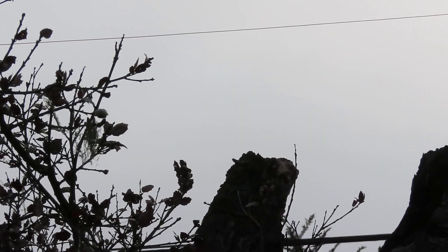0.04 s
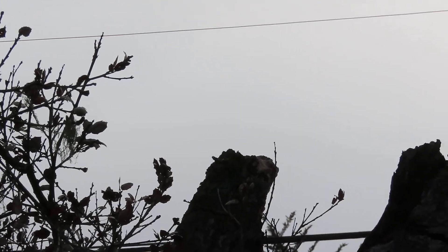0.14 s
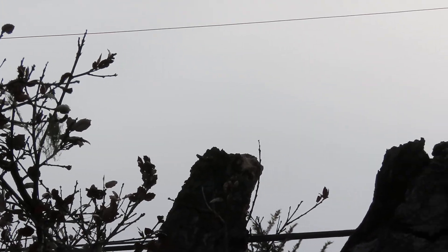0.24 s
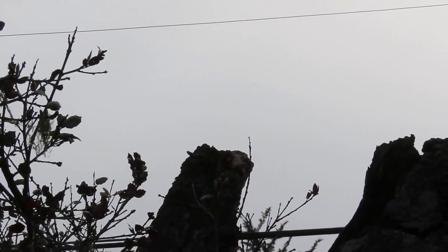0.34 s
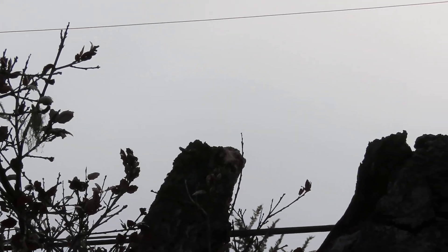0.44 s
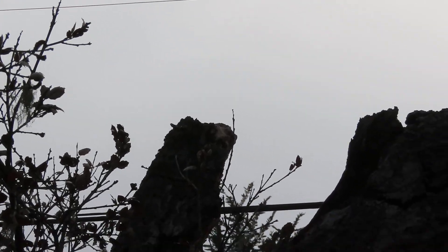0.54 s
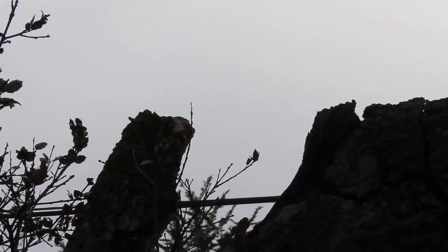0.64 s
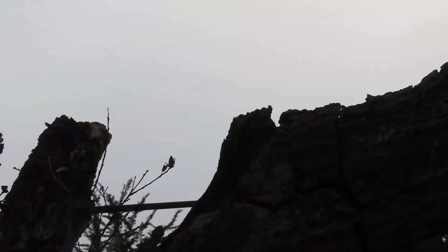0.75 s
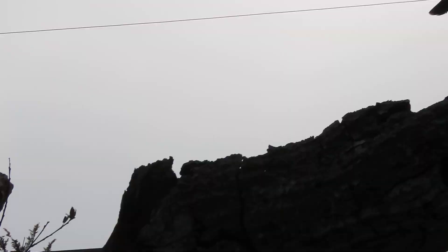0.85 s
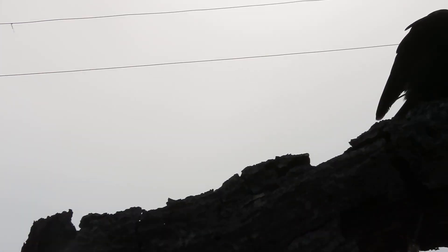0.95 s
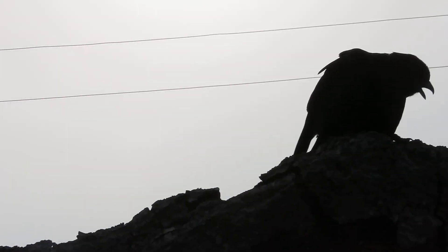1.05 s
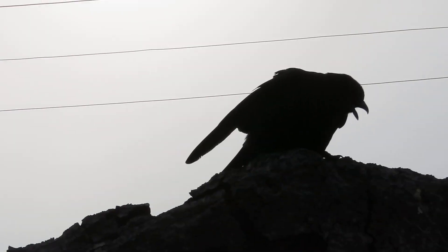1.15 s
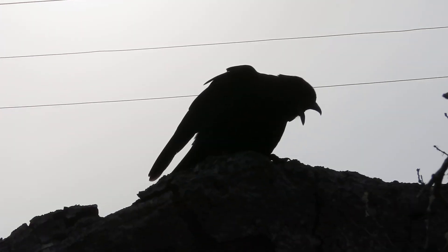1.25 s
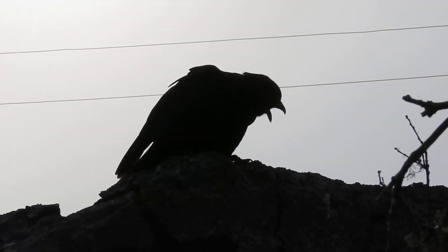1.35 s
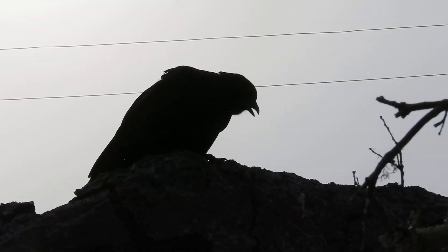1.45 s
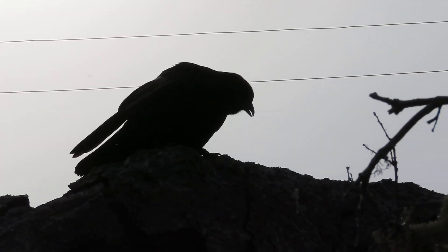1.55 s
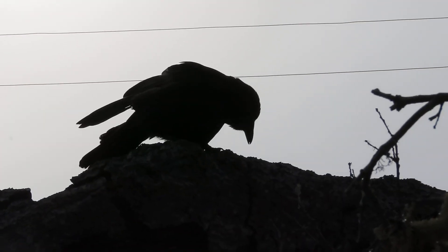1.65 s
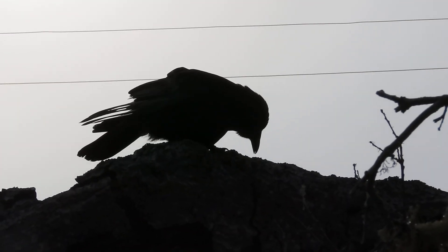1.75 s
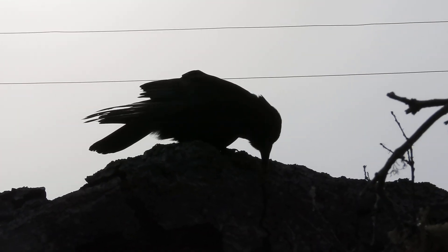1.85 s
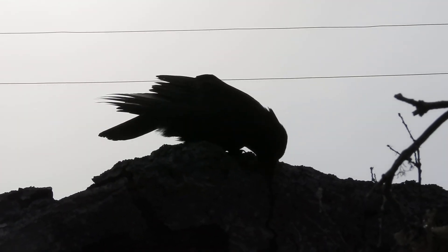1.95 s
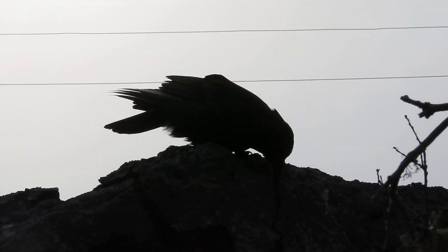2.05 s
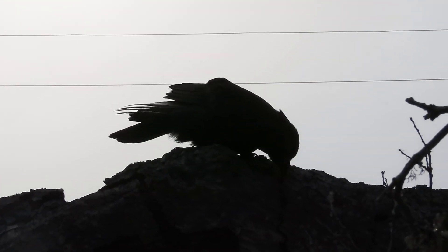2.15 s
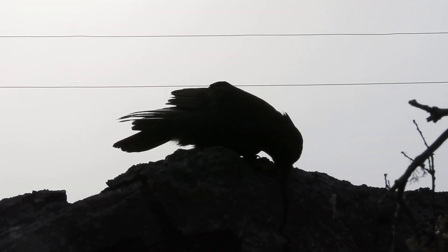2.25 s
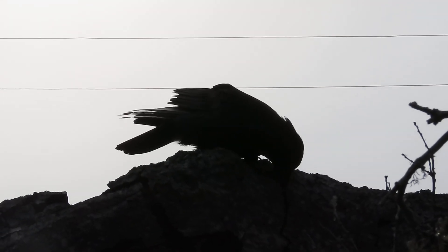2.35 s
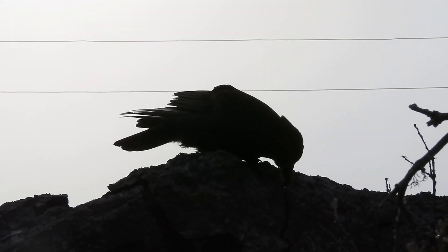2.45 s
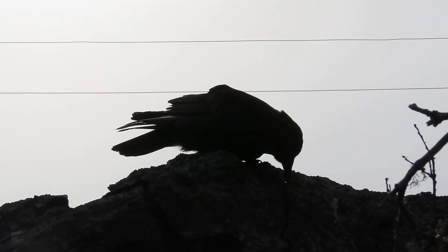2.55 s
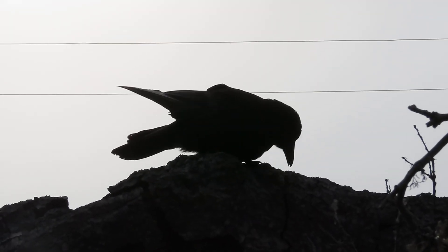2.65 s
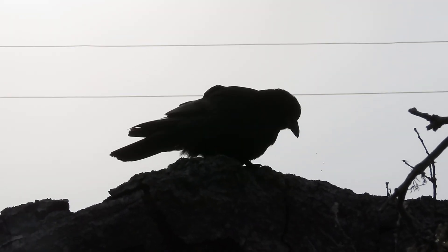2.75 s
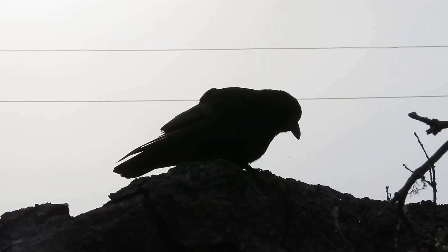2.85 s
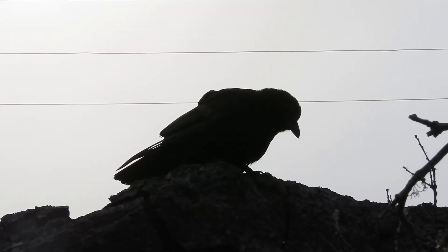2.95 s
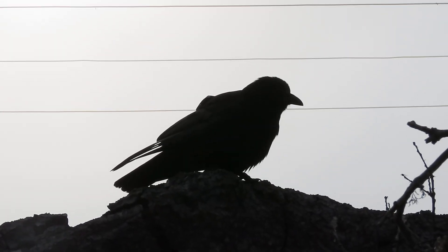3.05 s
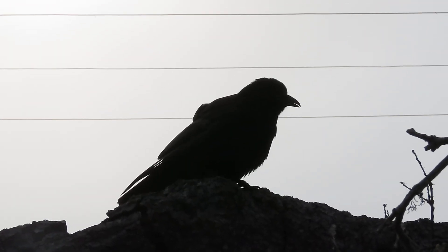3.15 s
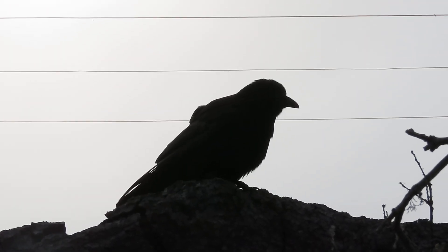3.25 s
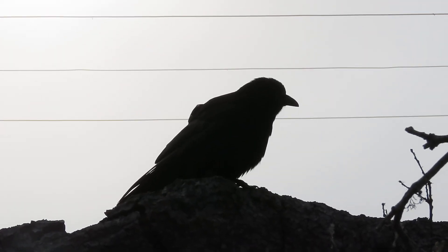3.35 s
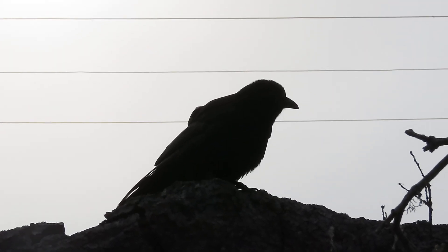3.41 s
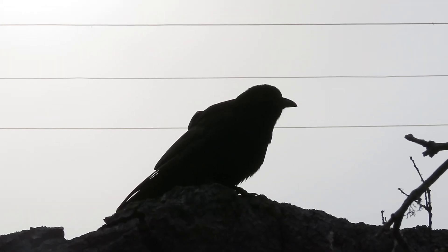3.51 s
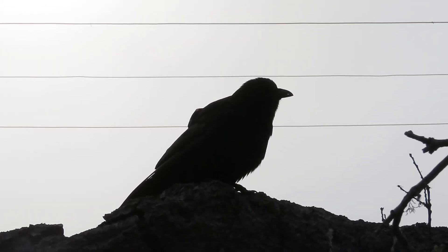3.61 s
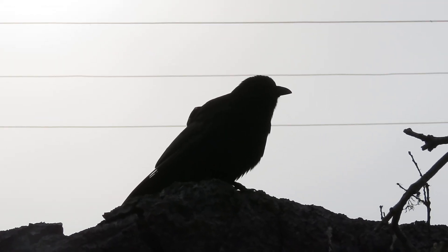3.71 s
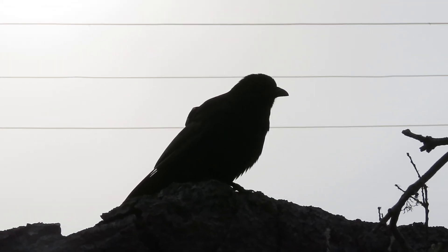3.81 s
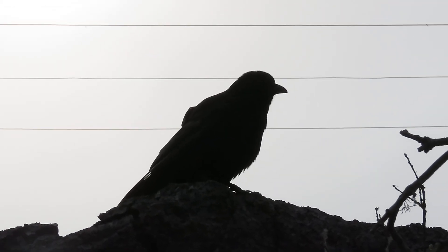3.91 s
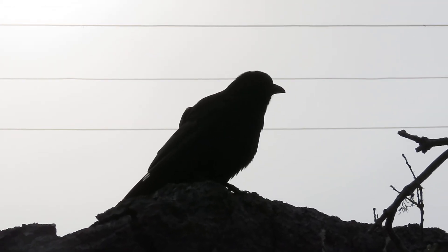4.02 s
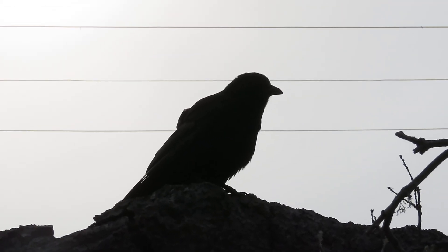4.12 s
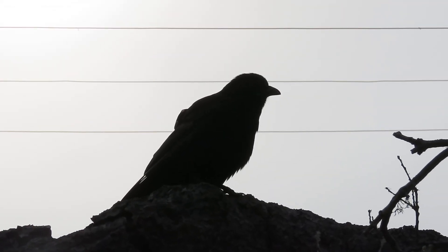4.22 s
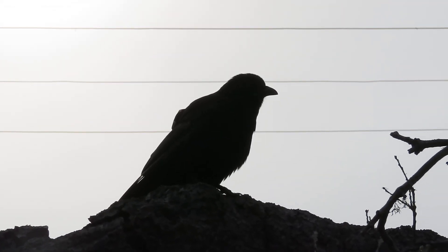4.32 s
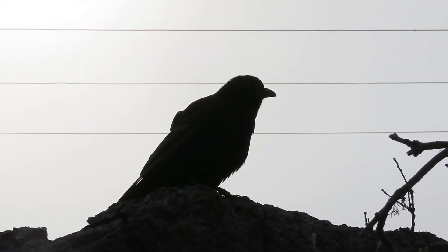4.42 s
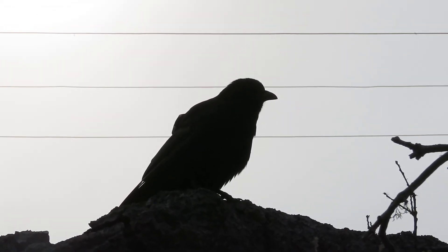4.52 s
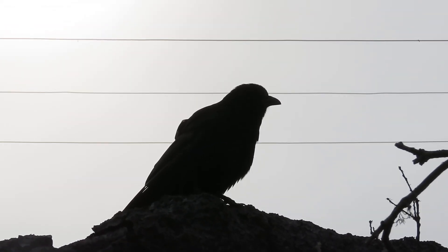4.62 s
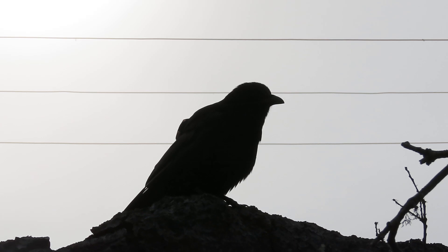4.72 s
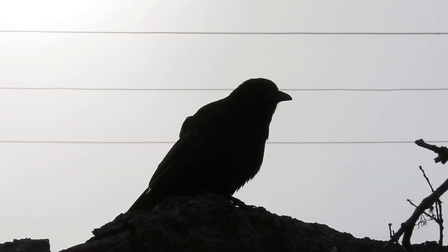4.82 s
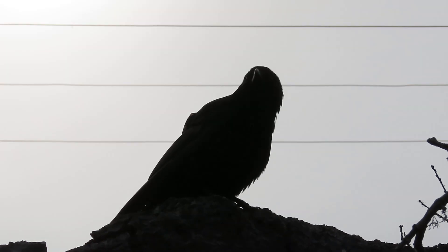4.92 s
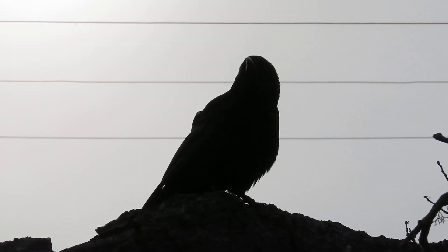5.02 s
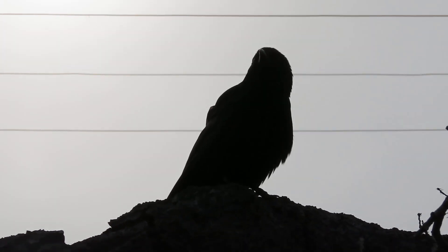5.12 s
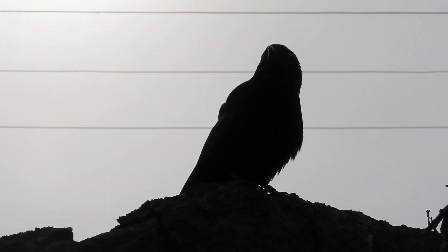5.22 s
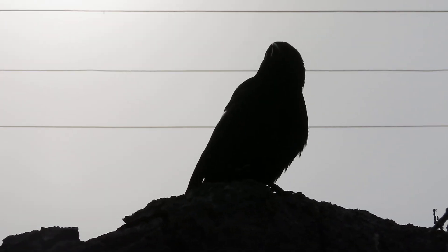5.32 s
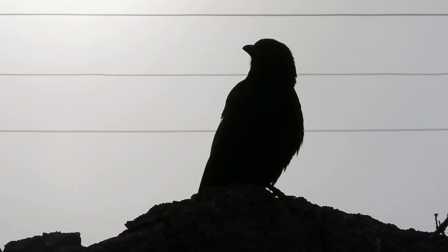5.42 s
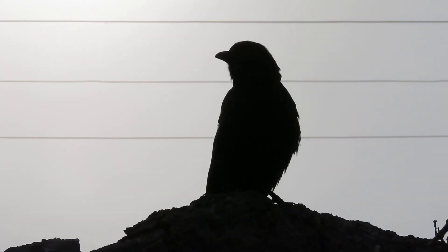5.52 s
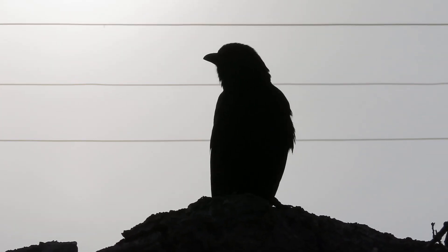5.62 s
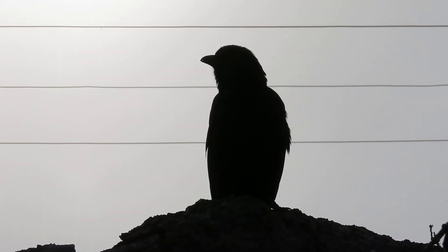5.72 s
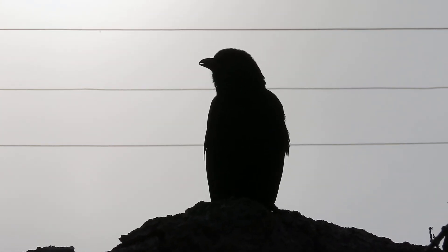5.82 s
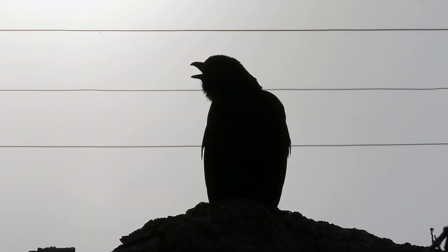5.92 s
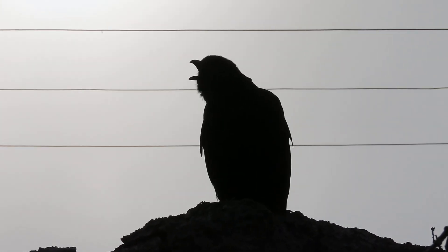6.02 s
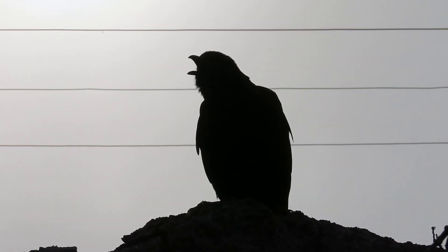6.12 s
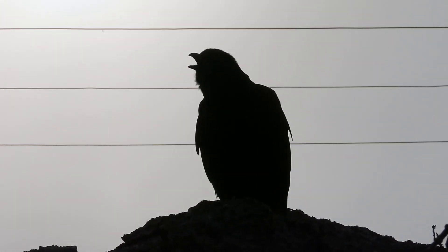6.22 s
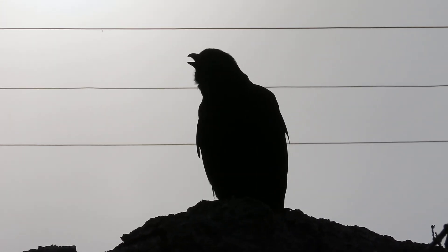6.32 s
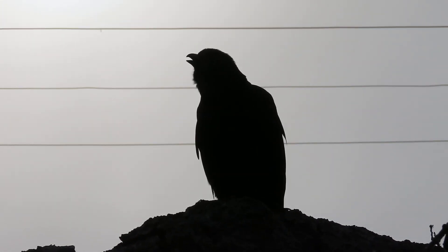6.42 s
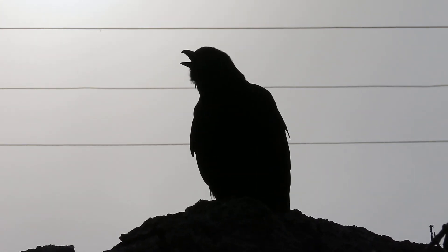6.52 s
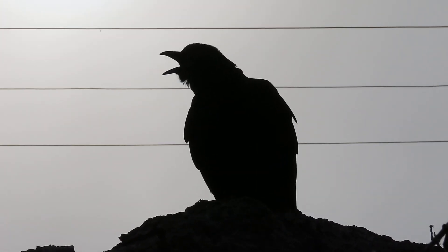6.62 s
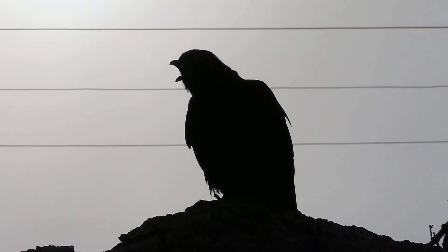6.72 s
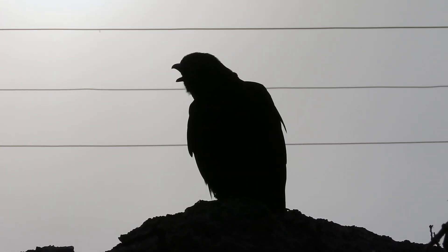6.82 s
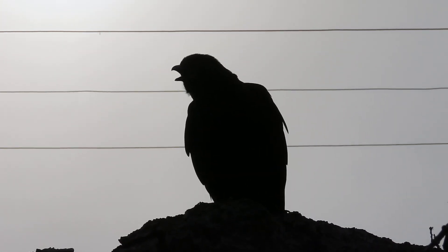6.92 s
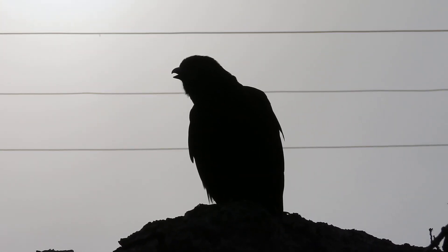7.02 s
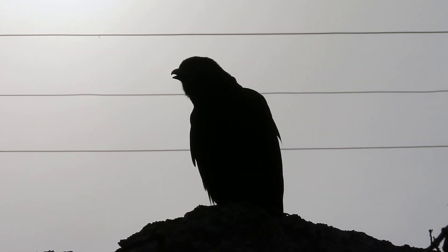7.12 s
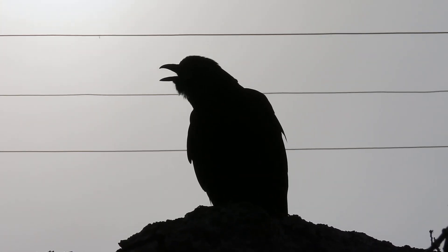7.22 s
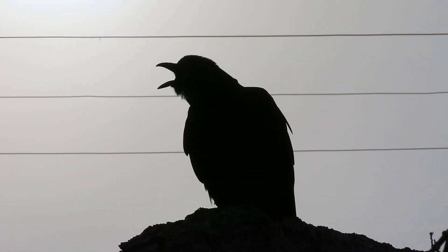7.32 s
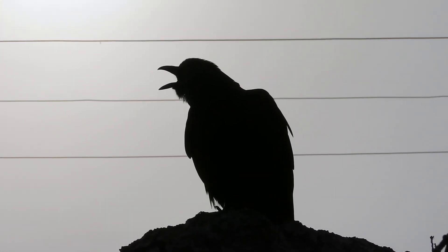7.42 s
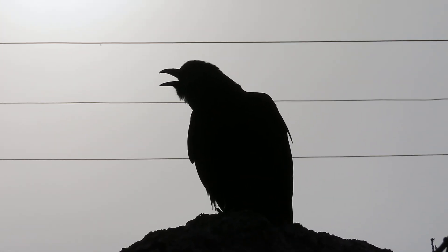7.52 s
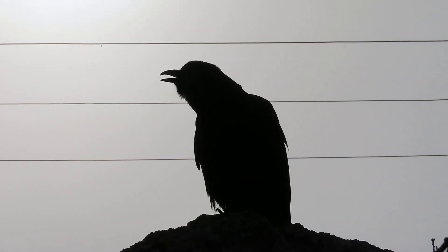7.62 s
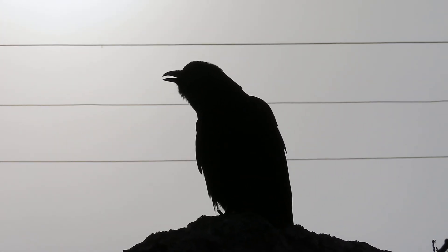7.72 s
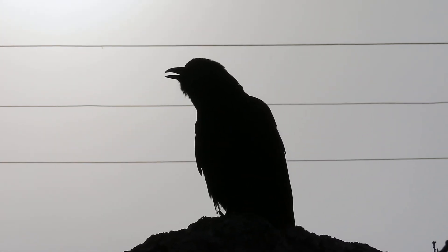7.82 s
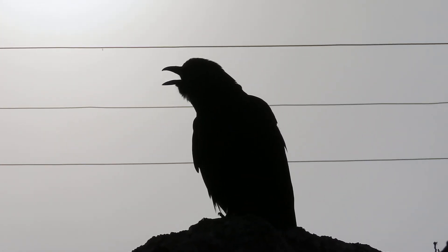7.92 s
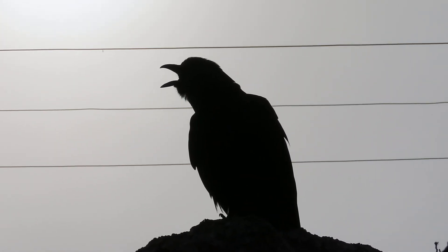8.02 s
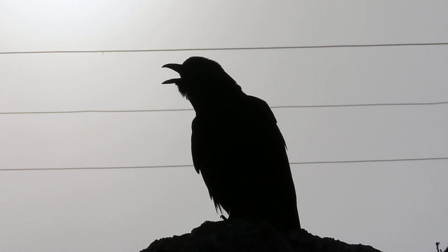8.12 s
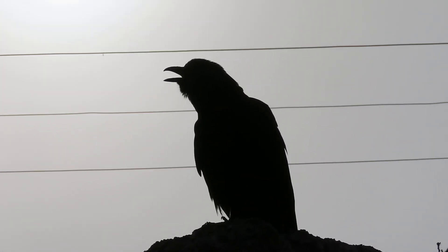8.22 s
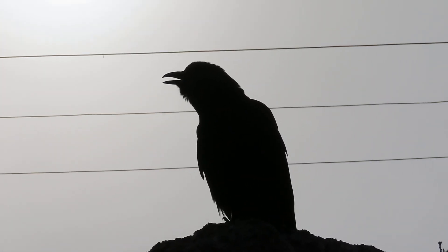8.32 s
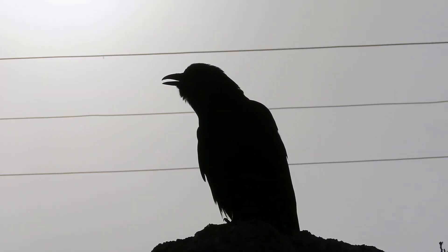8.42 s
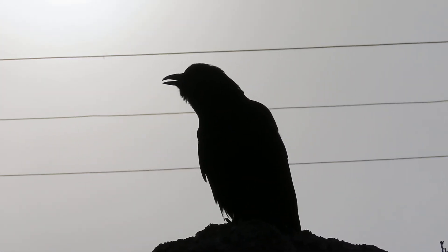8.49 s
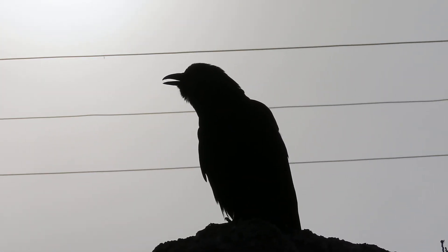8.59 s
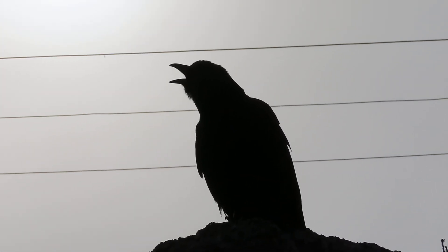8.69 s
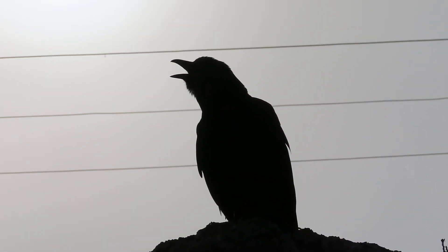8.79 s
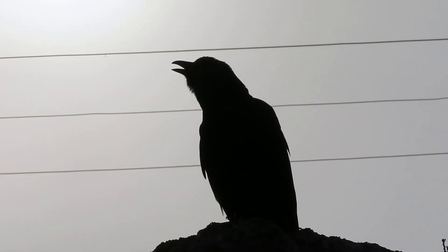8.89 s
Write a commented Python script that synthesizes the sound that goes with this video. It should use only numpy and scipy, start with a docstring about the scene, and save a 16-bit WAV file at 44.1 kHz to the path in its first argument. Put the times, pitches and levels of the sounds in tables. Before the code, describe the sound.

Outdoors, a close crow gives three harsh, buzzing caws, the first already under way. A farther, hoarser crow answers three times, then a fainter one at left makes four quick croaks. After a brief gap the near crow caws five times, the far one calling in between. Distant traffic hums softly throughout, with tiny bird chirps and low wind bumping the stereo microphone near the end.

```python
"""Distant traffic, made of shaped noise, runs throughout; a thin sine whine and low wind noise come and go.
A near crow caws three times, its first caw already under way; songbirds chirp as short gliding tones.
A farther crow answers three times, then one on the left gives four short calls.
At the end the near crow caws again in a second run, with the far one calling in between.
Each caw is a buzz from the two sides of the voice organ, whose beat throbs it in level and pitch."""
import sys
import numpy as np
from scipy import signal
from scipy.io import wavfile
from scipy.ndimage import uniform_filter1d

SR = 44100
rng = np.random.default_rng(int(sys.argv[2]) if len(sys.argv) > 2 else 0)


def unload_wav(signal):
    """Save mono or channel-first audio to the path in sys.argv[1] as 16-bit WAV at rate SR, clipped to [-1, 1]."""
    wavfile.write(
        sys.argv[1],
        SR,
        np.round(np.clip(np.atleast_2d(signal).T, -1, 1) * 32767).astype(np.int16),
    )


N = 394694  # length of the scene in samples

# Traffic colour. Each row: frequency in Hz, relative level in dB per Hz.
TRAFFIC_COLOUR = [(20, -0.5), (59, -9), (290, -8.), (550, -13), (812, -13), (1460, -20.5), (3360, -32.5),
                  (9000, -44.5), (15600, -59)]
# How alike the traffic is at left and right. Each row: frequency in Hz, likeness from 0 to 1.
LEFT_RIGHT_LIKENESS = [(60, 0.89), (380, 0.81), (2380, 0.89), (15000, 0.07)]
# Whine loudness over time. Each row: time in seconds, level in dB.
WHINE_LEVEL = [(.95, -80), (1.1, -62.5), (2.8, -64), (3.6, -78), (5.0, -75), (5.2, -63), (6.6, -70)]
# Wind loudness over time. Each row: time in seconds, level in dB.
WIND_LEVEL = [(5.0, -52.5), (5.9, -47), (6.6, -64), (7.4, -38), (7.65, -50), (7.9, -37), (8.199, -46),
              (8.45, -38.5), (8.95, -49)]
# Songbird chirps, one list per chirp. Each row: time in seconds, pitch in Hz, level in dB.
CHIRPS = [
    [(1.148, 6300, -64), (1.165, 5200, -52), (1.2, 5360, -72)],
    [(1.585, 4950, -66), (1.615, 4950, -57), (1.64, 4770, -68)],
    [(3.275, 2180, -38), (3.29, 5200, -51.5), (3.322, 5220, -50), (3.338, 2660, -47)],
]
# Small taps. Each row: time in seconds, peak level in dB, pitch in Hz.
TAPS = [(.546, -43, 3900), (4.762, -35, 450)]
# Throat resonances of each crow. Each row: centre in Hz, width in Hz before WIDENING, level in dB.
# The first two centres are multiples of the pitch instead. The fifth moves with the beak,
# and those after it shift with the neck and partly with the beak.
NEAR_THROAT = [(1.092, 367, -16.5), (1.935, 807, -23.5), (1617, 249, 0.5), (2116, 378, -9.),
               (4116, 297, -16.5), (3180, 1330, -31), (5750, 450, -28.5), (6875, 436, -25),
               (8190, 720, -29.5), (10700, 2500, -43.5)]
FAR_THROAT = [(0.91, 69, -14.5), (2, 540, -19.5), (1623, 243, 2), (2070, 385, -8), (3855, 294, -13.5),
              (6300, 400, -19), (4670, 1000, -28.5), (9150, 470, -24.5), (10400, 5100, -39)]
LEFT_THROAT = [(0.92, 81, -7.5), (2.21, 170, -6), (1510, 280, 8), (2060, 390, -9), (4090, 240, -6.5),
               (5140, 230, -11), (6600, 830, -19), (10500, 2400, -33)]
# Basic breath share of each kind of voice, from 0 to 1; weak effort adds more.
BREATH = {"clear": .14, "strained": .2, "hoarse": .34, "rasp": .55}
# The caws. Each row: bird, kind of voice, start in seconds, length in seconds, peak effort in dB,
# effort sag in dB, top and last pitch in Hz between the two sides, settled throbs per second before slowing,
# basic throb depth from 0 to 1, neck factor on the upper resonances, change of the seventh and top
# resonances in dB, change of the fifth in dB, beak opening at the start, late in the caw and at the end.
CAWS = [ ("near", "strained", -.129, .612, -13, -1.35, 552, 500, 78.0, 0.51, 0.99, 1, -4, 0.94, 1.08, 1.0),
        ("near", "clear", 0.686, .32, -9.5, -8.5, 585, 478, 69.0, 0.33, 1.027, 2.3, 3.7, 0.94, 0.89, 0.94),
        ("near", "clear", 1.264, .3, -9.5, -13, 590, 465, 64.2, 0.42, 1.02, -1, 2.9, 1.006, 0.97, 1.0),
        ("far", "hoarse", 2.178, .365, -26, -4.5, 520, 400, 62.0, 0.23, 0.99, 4.7, 0.1, 1, 0.98, 1),
        ("far", "hoarse", 2.772, .3, -25, -6.5, 525, 410, 62.0, .25, 1, -1.5, -1, 0.91, 0.93, 0.98),
        ("far", "hoarse", 3.49, .33, -26.5, -5.5, 530, 395, 62.0, 0.19, 1.04, -5, 0.1, 0.84, 0.88, 0.91),
        ("left", "rasp", 4.602, 0.12, -33.5, -0.83, 600, 690, 65.0, 0.25, 0.94, 5.1, -1.5, 0.98, 0.93, 0.86),
        ("left", "hoarse", 4.685, 0.184, -39.5, -0.92, 370, 455, 60.0, 0.43, 0.98, 6.2, 0.1, 0.95, 0.97, 1.0),
        ("left", "strained", 4.82, .345, -30.5, -8, 565, 480, 68.0, 0.29, 0.98, -1, 0.75, 1, 0.97, 0.97),
        ("left", "rasp", 5.108, 0.11, -35, -1.8, 430, 465, 56, 0.26, 0.93, 5, -1.6, 0.88, 0.92, .95),
        ("near", "clear", 5.995, 0.39, -11.5, -10.5, 560, 472, 76.3, 0.54, 0.99, -0.62, 0.1, 0.99, 0.99, 1),
        ("near", "clear", 6.606, .444, -10.5, -12.5, 615, 458, 70.0, 0.48, 1, -1.4, 0.1, 0.99, 1.008, 1),
        ("far", "hoarse", 7.107, 0.31, -28, -2.4, 465, 430, 69, 0.31, 0.97, 3.6, -1, 0.97, 0.97, 0.86),
        ("near", "clear", 7.321, 0.38, -9, -14, 648, 470, 68.9, 0.34, 1.024, -2.7, 0.1, 0.95, 0.96, 0.99),
        ("far", "hoarse", 7.59, .385, -27.5, -4, 520, 390, 62.0, 0.2, 1.02, 1.1, -1.5, 0.93, 0.93, 0.94),
        ("near", "clear", 7.981, 0.38, -10, -14, 626, 452, 67.8, 0.4, 1.0, -2.4, 0.1, 0.98, 0.98, 0.96),
        ("far", "hoarse", 8.26, .39, -27.5, -2.6, 512, 415, 68, 0.14, 1.04, 1.4, -0.5, 0.88, 0.95, 0.94),
        ("near", "clear", 8.72, .3, -9.5, -14, 618, 455, 60.7, 0.35, 1.0, -3, 0.11, 0.99, 0.99, .98), ]

TRAFFIC_DB, WHINE_HZ = -41, 3300
ATTACK_DB, RELEASE_DB, RELEASE_S = -22, -14, 0.058  # effort swells in and lets go
SAG_CURVE = 1.96  # above 1, effort sags ever faster
TOP_S, ONSET_DROP = .092, .27  # time to reach the top pitch; share below it at the start
CLIMB_CURVE, FALL_CURVE = 1.5, .8
SETTLE_S, SLOWING_PER_S2 = .0742, 18.3  # the throb rate settles, and keeps slowing
BURST_LEAD = 0.202  # the burst leads the throb peak by this share of a throb
TWIN = .45  # strength of the weaker side of the voice organ, 0-1
BREAK_DB, BREAK_SPAN_DB = 5.0, 3.0  # the voice starts to break at this sag, and is broken a span later
BREAK_DROP = .035  # share by which a broken voice is lower
ONSET_SNAP, TAIL_SNAP = 2.5, 1.5  # how fast a burst dies within a throb, at the start and afterwards
BEAK_LATE = 0.67  # share of the caw where the late beak opening is reached
TREBLE_FOLLOW = 0.42  # share of the beak's motion that the upper resonances follow
WIDE_BEAK_DB = 59  # fourth resonance gains, third loses this per unit of beak opening beyond 1
STRAINED_CHEST_DB = -2.5  # a strained caw has weak low partials
WIDENING = 1.9  # each resonance is used twice in a row, so each pass is wider
EDGE_HZ = 15720  # upper band limit


def gain_of(db):
    """Turns dB into a plain multiplier."""
    return 10 ** (np.asarray(db) / 20)


def evened(x):
    """Scales a sound to an average (rms) level of 1."""
    return x / np.sqrt(np.mean(x ** 2) + 1e-20)


def read(points, hz):
    """Reads a table between its rows, on a logarithmic frequency axis."""
    f, value = np.transpose(points)
    return np.interp(np.log(hz + 1), np.log(f + 1), value)


def add(mix, s, sound):
    """Mixes a sound in at time s, cutting whatever lies outside the scene."""
    at = round(s * SR)
    part = mix[max(at, 0):][:len(sound) + min(at, 0)]
    part += sound[max(-at, 0):][:len(part)]


def drift(size, smooth_s):
    """Makes a random wander of rms 1 by smoothing noise twice."""
    span = int(smooth_s * SR) + 1
    once = uniform_filter1d(rng.standard_normal(size), span)
    return evened(uniform_filter1d(once, span))


def resonate(x, hz, width):
    """A resonance of gain 1: shifts its centre down to zero, smooths, and shifts back."""
    turn = np.exp(2j * np.pi * np.cumsum(hz * np.ones(len(x))) / SR)
    r = np.exp(-np.pi * width / SR)
    return 2 * (turn * signal.lfilter([1 - r], [1, -r], x / turn)).real


def echoes(x, t60, start_s):
    """Trees and walls scatter sound back: sparse taps of random sign, dulled and fading 60 dB in t60."""
    size = SR // 20
    taps = np.zeros((2, 20 * size))
    at = 20 * np.arange(size) + rng.integers(0, 20, (2, size))
    np.put_along_axis(taps, at, rng.choice([-1., 1.], at.shape), 1)
    t = np.arange(20 * size) / SR
    taps *= gain_of(-60 * t / t60) * (t > start_s)
    taps = signal.lfilter([1], [1, -.6], taps)
    return signal.fftconvolve(x[None], taps / np.linalg.norm(taps[0]), axes=1)[:, :N]


def traffic():
    """Distant traffic: noise built from short random spectra, with slowly drifting patches of level."""
    frames, hz = N // 256 + 5, np.fft.rfftfreq(1024, 1 / SR)
    a, b, c, d, patches = rng.standard_normal((frames, 513, 5)).T
    patches = evened(uniform_filter1d(uniform_filter1d(patches, 10, 0), 20, 1))
    same = np.clip(read(LEFT_RIGHT_LIKENESS, hz), -1, 1)[:, None]
    left = a + 1j * b
    right = same * left + np.sqrt(1 - same ** 2) * (c + 1j * d)
    spectra = np.array([left, right]) * gain_of(read(TRAFFIC_COLOUR, hz)[:, None] + 0.74 * patches)
    noise = signal.istft(spectra, nperseg=1024, noverlap=768)[1][:, :N]
    return gain_of(TRAFFIC_DB) * evened(noise)


def whine():
    """A thin sine tone of steady pitch that comes and goes, its level wavering slightly."""
    t = np.arange(N) / SR
    level_db = np.interp(t, *np.transpose(WHINE_LEVEL)) + 0.94 * drift(N, 0.019)
    return np.sqrt(2) * gain_of(level_db) * np.sin(2 * np.pi * WHINE_HZ * t)


def wind():
    """Wind on the microphone: noise narrowed to a low rumble with random lumps."""
    rumble = resonate(resonate(rng.standard_normal(N), 67.0, 44), 67.0, 44)
    lumps_db = 3.5 * drift(N, 0.0088)
    level_db = np.interp(np.arange(N) / SR, *np.transpose(WIND_LEVEL))
    return evened(rumble * gain_of(lumps_db)) * gain_of(level_db)


def songbirds_and_taps():
    """Chirps are gliding sine tones, taps are quickly fading ones; both get a short echo."""
    out = np.zeros(N)
    for rows in CHIRPS:
        s, hz, db = np.transpose(rows)
        t = np.arange(s[0], s[-1], 1 / SR)
        glide = uniform_filter1d(np.interp(t, s, hz), size=500, mode="nearest")
        tone = np.sin(2 * np.pi * np.cumsum(glide) / SR)
        level = np.sqrt(2) * gain_of(np.interp(t, s, db))
        add(out, s[0], level * tone * signal.windows.tukey(len(t), .15))
    for s, db, hz in TAPS:
        cycles = np.arange(1500) * hz / SR
        add(out, s, gain_of(db - 0.91 * cycles) * np.sin(2 * np.pi * cycles))
    return out + gain_of(-10) * echoes(out, t60=0.32, start_s=0.0115)


def through_throat(body, rasp, throat, hz, opening, neck, upper_db, fifth_db, chest_db):
    """The throat as a row of resonances, moved by pitch, beak and neck; returns one band for each."""
    upper = neck * (1 + TREBLE_FOLLOW * (opening - 1))
    factors = [hz, hz, 1, 1, opening] + [upper] * len(throat)
    bands = []
    for k, ((centre, width, db), factor) in enumerate(zip(throat, factors)):
        f, w = centre * factor, WIDENING * width
        band = resonate(resonate(body if k < 3 else rasp, f, w), f, w)
        bands.append((-1) ** k * gain_of(db) * band)
    wide = gain_of(WIDE_BEAK_DB * np.maximum(opening - 1, 0))
    bands[2] = bands[2] / wide
    bands[3] = bands[3] * wide
    for k, db in [(0, chest_db), (1, chest_db), (4, fifth_db), (6, upper_db), (-1, upper_db)]:
        bands[k] = bands[k] * gain_of(db)
    return bands


def caw(throat, length, peak_db, sag_db, top_hz, last_hz, settled, depth, neck, upper_db, fifth_db, *beak,
        rough, attack_s, first_throbs, jitter, swing_hz, climbs=1, chest_db=0):
    """Membrane pulses and breath throb, then pass the throat; sagging effort breaks them into rasps."""
    t = np.arange(0, length, 1 / SR)
    sagged_db = sag_db * (t / length) ** SAG_CURVE
    attack_db = ATTACK_DB * np.maximum(1 - t / attack_s, 0) ** 2
    release_db = RELEASE_DB * np.maximum(1 - (length - t) / RELEASE_S, 0) ** 2
    effort_db = peak_db + attack_db + sagged_db + release_db
    slack = np.clip((effort_db.max() - effort_db) / 13, 0, 1)  # 1 where effort is weak
    broken = np.clip((-sagged_db - BREAK_DB) / BREAK_SPAN_DB, 0, 1)

    # the pitch climbs, falls, and wavers slowly
    climb = 1 - climbs * ONSET_DROP * np.maximum(1 - t / TOP_S, 0) ** CLIMB_CURVE
    fall = np.maximum((t - TOP_S) / max(length - TOP_S, .05), 0) ** FALL_CURVE
    hz = top_hz * climb + (last_hz - top_hz) * fall
    hz = uniform_filter1d(hz * (1 - BREAK_DROP * broken), 1300, mode="nearest")
    hz = hz * (1 + .008 * drift(len(t), .02))

    # throbs are counted in cycles
    rate = settled - SLOWING_PER_S2 * t + (first_throbs - settled) * np.exp(-(t / SETTLE_S) ** 2)
    throbs = np.cumsum(rate) / SR - BURST_LEAD  # the caw opens on a burst
    throbs = throbs + (.018 + .05 * slack + .1 * broken) * drift(len(t), .005)
    wave = np.cos(2 * np.pi * throbs)

    # the weaker side sings one throb rate above the stronger
    pair = 1 + min(TWIN, 1) * np.exp(2j * np.pi * throbs)
    swing = swing_hz * np.cos(2 * np.pi * throbs + 0.9)  # the pitch sways with each throb
    shake = jitter * (1 + 2 * slack + 5 * broken) * hz * drift(len(t), 0.0016)
    turns = np.cumsum(hz - TWIN * rate / 2 + swing + shake) / SR
    turns = turns + np.angle(pair) / (2 * np.pi)  # the pitch dips where the two sides cancel
    pulses = sum(np.cos(2 * np.pi * k * turns) for k in range(1, 26))
    puffs = (.12 + np.exp(-(turns % 1) / .22)) * rng.standard_normal(len(t))  # breath with each pulse

    # row 0 feeds the low resonances, row 1 the upper ones, which get more breath
    share = np.clip(rough + .25 * slack + .15 * broken + [[0], [.14]], 0, 1)
    effort = gain_of(effort_db + drift(len(t), .002))
    source = effort * ((1 - share) * evened(pulses) + share * evened(puffs))

    # slack membranes burst open, then die; the treble throbs less but snaps harder
    snap_rate = np.where(t < attack_s, ONSET_SNAP, TAIL_SNAP) * slack ** 2
    snap = uniform_filter1d(np.exp(-snap_rate * ((throbs + BURST_LEAD) % 1)), 30)
    body_depth = np.clip(depth + .5 * slack - 0.55 * broken, 0, 1)
    rasp_depth = np.clip(0.64 * depth + 0.056 * slack, 0, 1)
    throbbing = [snap * (1 - body_depth * (1 - wave) / 2), snap ** 2 * (1 - rasp_depth * (1 - wave) / 2)]
    # dividing by the smoothed strength keeps the throbs from changing the slower level
    body, rasp = (v * g / np.sqrt(uniform_filter1d(g ** 2, 900)) for v, g in zip(source, throbbing))

    opening = np.interp(t / length, [0, BEAK_LATE, 1], beak)
    bands = through_throat(body, rasp, throat, hz, opening, neck, upper_db, fifth_db, chest_db)
    # the first four bands together get the level of the effort
    scale = np.sqrt(np.mean(gain_of(effort_db) ** 2) / np.mean(sum(bands[:4]) ** 2))
    fade_out = np.minimum(1, np.arange(len(t))[::-1] / 300)
    return scale * sum(bands) * fade_out


def crows():
    """Three birds, each with its own throat and place; the far and left ones echo more than the near one."""
    near, far, left = np.zeros((3, N))
    near_voice = dict(attack_s=0.061, first_throbs=104.3, jitter=.008, swing_hz=24.05)
    far_voice = dict(attack_s=.055, first_throbs=90, jitter=.02, swing_hz=30.1)
    left_voice = dict(attack_s=0.021, first_throbs=70, jitter=0.008, swing_hz=21.2, climbs=0)
    birds = {"near": (near, NEAR_THROAT, near_voice),
             "far": (far, FAR_THROAT, far_voice),
             "left": (left, LEFT_THROAT, left_voice)}
    for bird, kind, start, *row in CAWS:
        mix, throat, voice = birds[bird]
        chest_db = STRAINED_CHEST_DB if kind == "strained" else 0
        add(mix, start, caw(throat, *row, rough=BREATH[kind], chest_db=chest_db, **voice))
    # the near bird is a little to the right, then closer to the middle
    turn_db = np.where(np.arange(N) < 1.1 * SR, 1.6, .6)
    direct = near * gain_of([-turn_db / 2, turn_db / 2]) + far * gain_of([[-.3], [.3]])
    # the left bird is louder at the left and reaches the right two samples later
    direct += np.array([left * gain_of(2.0), np.roll(left, 2) * gain_of(-2.0)])
    to_echo = gain_of(-27.5) * near + gain_of(-20.0) * (far + left)
    return direct + echoes(to_echo, t60=1.0, start_s=0.012)


def scene():
    """Adds up all sources at the two microphone ports."""
    return crows() + songbirds_and_taps() + traffic() + whine() + wind()


def record(dry):
    """The housing scatters treble oppositely into the ports; peaks are rounded off and the top cut."""
    housing = np.convolve(rng.standard_normal(400) * np.exp(-np.arange(400) / 130), [1, -1])
    scatter = gain_of(-10) * signal.oaconvolve(dry.mean(0), housing / np.linalg.norm(housing))[:N]
    ports = .95 * np.tanh((dry + np.array([scatter, -scatter])) / .95)
    band_limit = signal.firwin(1023, EDGE_HZ, window=("kaiser", 9), fs=SR)
    return signal.oaconvolve(ports, band_limit[None], "same")


dry = scene()
out = record(dry)
unload_wav(out)
```